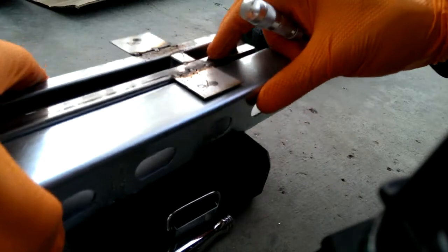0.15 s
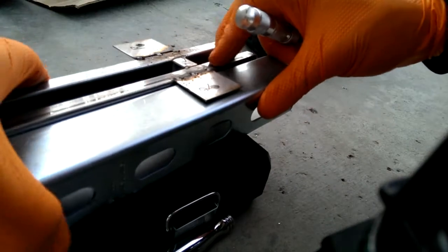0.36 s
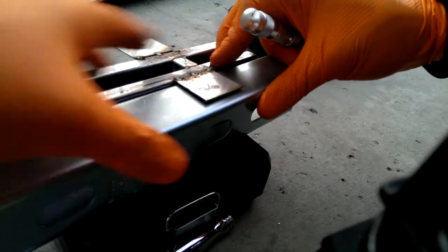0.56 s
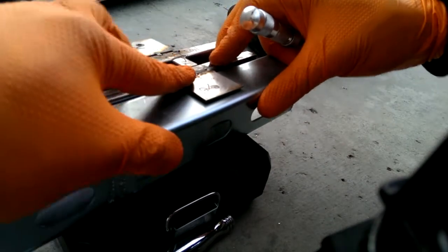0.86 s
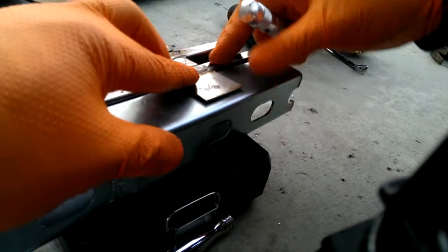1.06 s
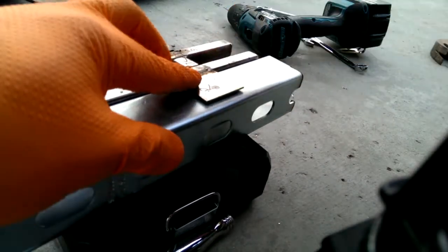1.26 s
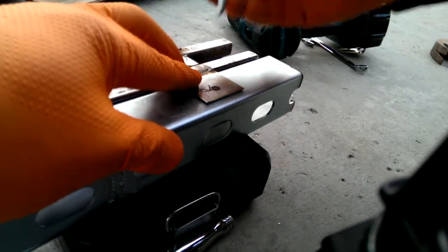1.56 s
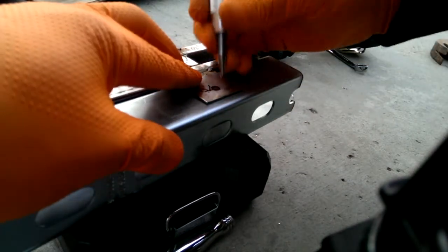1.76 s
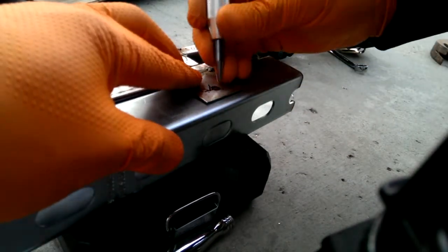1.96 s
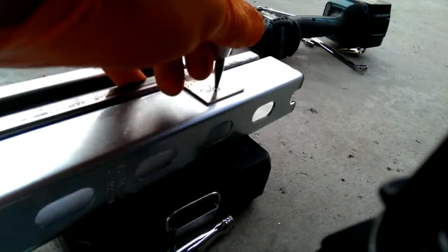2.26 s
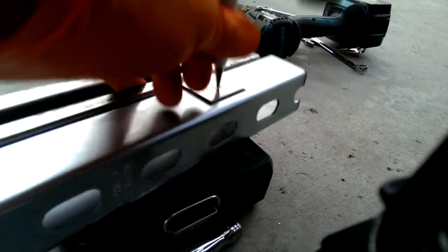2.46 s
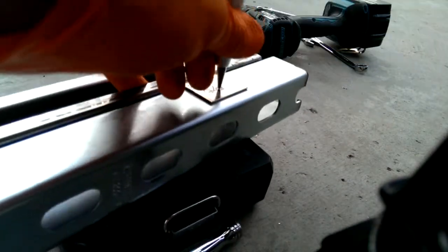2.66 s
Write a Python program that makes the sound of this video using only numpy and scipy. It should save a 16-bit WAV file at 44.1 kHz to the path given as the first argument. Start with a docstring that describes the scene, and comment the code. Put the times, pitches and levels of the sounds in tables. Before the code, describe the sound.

A center punch fires with one hard metallic crack near the end, plate bouncing and ringing briefly. Earlier, a loose steel plate scrapes and knocks on a beam, then faint glove rustles; close microphone, low workshop hum.

```python
"""A workshop's low rumble (shaped noise) and hum (wavering tones) run throughout. A gloved worker nudges a
steel plate along a perforated steel beam: it chatters (many tiny puffs of noise) and knocks (fading bursts).
Gloves rustle (soft swells of grainy noise) and tick. Then a spring-loaded center punch fires: sharp bursts,
after which plate and tip bounce, the plate rattles and the steel rings (fading sine tones)."""
import sys
import numpy as np
from scipy import signal
from scipy.fft import rfft, irfft
from scipy.io import wavfile
from scipy.ndimage import uniform_filter1d

SR = 44100
rng = np.random.default_rng(int(sys.argv[2]) if len(sys.argv) > 2 else 0)


def pcm_store(signal):
    """Save signal as 16-bit PCM."""
    levels = np.round(np.clip(np.atleast_2d(signal), -1, 1) * 32767)
    wavfile.write(sys.argv[1], SR, levels.astype(np.int16).T)


def boost_factor(decibels):
    """Convert a level in decibels to a linear amplitude factor."""
    exponent = np.asarray(decibels, float) / 20
    return 10 ** exponent


N = 123479  # length in samples

# All levels in dB are those of a layer before the side balance and the soft overload.
# Room noise of the shop. Each row: frequency in Hz, relative level in dB.
SHOP_SPECTRUM = [(28, -37), (40, 3), (60, 1), (85, -12.5), (150, -20.5), (250, -22.5), (450, -32),
                 (1350, -36), (5000, -44.5), (13000, -51), (16000, -50)]
# How alike the room noise is on both sides. Each row: frequency in Hz, likeness from -1 to 1.
SHOP_LIKENESS = [(60, 0.52), (380, 0.39), (2380, -0.013), (15000, -0.2)]
# Swell of the rumble. Each row: time in seconds, relative level in dB.
RUMBLE_SWELL = [(0, -44), (.2, -38.5), (.6, -45), (1.4, -45.5), (1.9, -47.5), (2.8, -47.5)]
# Fuzzy tones of the hum. Each row: multiple of the hum's pitch, relative level in dB, width in Hz.
HUM_TONES = [(1, -50, 7.7), (2, -61, 34)]
# The hum's third multiple. Each row: time in seconds, level in dB.
HUM_THIRD = [(0, -58.5), (.15, -46.5), (.35, -59), (.55, -49.5), (.65, -70), (.85, -51.5), (1.0, -68.5),
             (1.55, -76), (1.75, -58), (2.8, -61)]
# Loose plate chattering as it slides. Each row: time in seconds, relative level in dB.
SLIDE = [(0, -46), (.04, -51), (.06, -56), (.11, -61.5), (.116, -37.5), (.215, -39), (.24, -49), (.33, -41),
         (.37, -60)]
# Loose plate chattering after the snap. Each row: time in seconds, relative level in dB.
RATTLE = [(2.367, -33.5), (2.43, -30.5), (2.49, -30.5), (2.535, -41), (2.55, -32.5), (2.6, -48),
          (2.70, -53.5), (2.725, -58.5), (2.8, -63)]
# Colour of the chattering steel. Each row: frequency in Hz, relative level in dB.
STEEL_COLOUR = [(60, -54), (200, 0), (500, 1), (4200, -2.5), (14400, -17.5)]
# The plate knocks on the beam.
# Each row: start in seconds, relative level in dB, centre in Hz, seconds to fade by 60 dB.
KNOCKS = [(.114, -25.5, 714, 0.016), (.1245, -19.5, 6030, 0.01), (.141, -26, 2730, 0.045),
          (.1815, -16.5, 2500, 0.021), (.2005, -17.5, 1150, 0.023), (.2505, -13.5, 7360, 0.0088),
          (.2682, -13, 1800, 0.014), (.2815, -12, 2750, 0.021), (.335, -23.5, 1640, 0.041)]
# Faint ticks of gloves and tip.
# Each row: start in seconds, relative level in dB, centre in Hz, octaves to 6 dB down (sign ignored).
TICKS = [(.671, -34, 1210, 0.5), (.689, -48.5, 11000, 6), (.754, -44.5, 4700, 0.5), (0.971, -43, 6330, -6),
         (1.123, -46, 4960, 1.5), (1.305, -43.5, 3230, 0.7), (1.429, -38.5, 4400, 0.7),
         (1.442, -36.5, 1090, 1.24), (1.4811, -33, 3070, 1), (2.165, -42.5, 1740, 1.2)]
# The punch fires. Each row: start in seconds, relative level in dB, centre in Hz, seconds to fade by 60 dB.
SNAPS = [(2.367, -8, 2560, 0.014), (2.372, -5.5, 3330, 0.076), (2.389, -12.5, 4700, 0.071)]
# Plate and tip bounce after the snap.
# Each row: start in seconds, relative level in dB, centre in Hz, seconds to fade by 60 dB.
BOUNCES = [(2.396, -9, 2360, 0.035), (2.404, -16, 1370, 0.023), (2.423, -24, 400, 0.013),
           (2.441, -17, 1210, 0.01), (2.470, -14, 1150, 0.024), (2.484, -21, 2980, 0.12),
           (2.510, -17, 1120, 0.028), (2.542, -17, 3500, 0.079), (2.565, -24, 980, 0.062),
           (2.607, -23, 1710, 0.027), (2.641, -32.5, 1780, 0.028), (2.660, -28, 3150, 0.017),
           (2.692, -30, 1750, 0.047)]
# Reflections from beam and floor. Each row: frequency in Hz, seconds to fade by 60 dB.
TAIL_FADE = [(300, 0.036), (3000, 0.13), (12000, 0.053)]
# Gloves and sleeves brush. Each row: start in seconds, length in seconds, centre in Hz,
# octaves to 6 dB down (sign ignored), relative level in dB.
BRUSHES = [(0.428, 0.15, 5200, 1.7, -54.5), (0.574, 0.096, 3560, 0.6, -60.5),
           (0.699, 0.11, 1980, 0.94, -60.5), (0.99, 0.059, 10400, 2.5, -61.5),
           (1.214, 0.089, 2290, 1.0, -61), (1.827, 0.05, 12000, 2.5, -71), (2.009, 0.11, 2970, 0.5, -71),
           (1.559, 0.086, 12500, 1.2, -63.5), (1.57, 0.076, 2060, 0.5, -57),
           (2.191, 0.11, 3730, -0.35, -62)]
# Strong ringing tones of the steel.
# Each row: frequency in Hz, relative level in dB, seconds to fade by 60 dB (before any stifling).
STEEL_MODES = [(310, -3, .1), (470, -13, .2), (630, -21, .7), (2569, -15, .25), (2760, -24, .8),
               (3363, -13, .35), (3955, -10, .25), (4314, 3, .7), (4371, -3, .5), (4528, -11, .45),
               (6524, -12, .5), (11713, -12, .5)]
# Side balance of the near sounds. Each row: frequency in Hz, left minus right in dB.
NEAR_BALANCE = [(600, 1), (1400, 7), (3000, 5), (5500, 8.5), (9000, 14), (14000, 17.5)]
# Side balance of the punch's snap. Each row: frequency in Hz, left minus right in dB.
PUNCH_BALANCE = [(1200, 10.5), (3500, -11), (11000, 3)]

SHOP_DB, SHOP_SIDE_DB = -43, 0.3  # noise level before its swell; left is raised and right lowered by this
HUM_HZ = 65.07
CHATTER_PER_S, CHATTER_SPREAD_DB = 1500, 3  # average count of contacts; how uneven they are
SLIDE_TILT_DB, RATTLE_TILT_DB = -2.5, -1  # per octave, added to the steel's colour
KNOCK_OCTAVES, BLOW_OCTAVES = (3.5, 0.82), (1.35, 0.67)  # to 6 dB down, below and above the centre
TICK_T60_S = 0.013  # seconds to fade by 60 dB
UNLIKE = 0.99  # noise of each side's own, against 1 of the noise they share
TAIL_DB = -5
BLOW_RING_DB = -12  # how strongly blows drive the ringing
DENSE_DB, DENSE_T60_S = -18, 0.29  # many weak modes: highest level, scale of their fading times
DAMP_S, DAMP_DB_PER_S, DAMP_ABOVE_HZ = 2.518, 155, 3000  # the settling plate stifles its high ring
RIGHT_LAG_S = 0.000247
BASS_EDGE_HZ, TREBLE_EDGE_HZ = 32, 15900


def evened(x):
    """Scales to rms 1."""
    return x / np.sqrt(np.mean(x ** 2) + 1e-20)


def read(points, hz):
    """Reads a table of frequencies, evenly by pitch between its rows."""
    f, value = np.transpose(points)
    return np.interp(np.log(hz + 1), np.log(f + 1), value)


def add(mix, s, sound):
    """Mixes a sound in at s seconds."""
    part = mix[..., round(s * SR):][..., :sound.shape[-1]]
    part += sound[..., :part.shape[-1]]


def colour(x, db_at, lag_s=0):
    """Filters by a gain in dB given as a function of frequency, and delays by lag_s."""
    hz = np.fft.rfftfreq(x.shape[-1], 1 / SR)
    delay = np.exp(-2j * np.pi * hz * lag_s)
    return irfft(rfft(x) * boost_factor(db_at(hz)) * delay, x.shape[-1])


def peaked(noise, centre_hz, below, above):
    """Noise that falls away ever faster on both sides of a centre."""
    def db_at(hz):
        octaves = np.log2((hz + 1) / centre_hz)
        width = np.where(octaves < 0, below, above)
        return -6 * abs(octaves / width) ** 1.3
    return evened(colour(noise, db_at))


def sides(x, balance):
    """Sound reaches the left side first, and its balance depends on frequency."""
    left = colour(x[0], lambda hz: read(balance, hz) / 2)
    right = colour(x[1], lambda hz: -read(balance, hz) / 2, RIGHT_LAG_S)
    return np.array([left, right])


def rumble_swell():
    """The rumble's rise and fall in dB around its mean, one value for every 512 samples."""
    frame_s = np.arange(N // 512 + 5) * 512 / SR
    swell = np.interp(frame_s, *np.transpose(RUMBLE_SWELL))
    return frame_s, swell - swell.mean()


def room_noise(swell):
    """Random spectra, partly shared by the sides, whose low end swells and fades."""
    hz = np.fft.rfftfreq(2048, 1 / SR)[:, None]
    a, b, c, d = rng.standard_normal((len(swell), 1025, 4)).T
    same = np.clip(read(SHOP_LIKENESS, hz), -1, 1)
    left = a + 1j * b
    right = same * left + np.sqrt(1 - same ** 2) * (c + 1j * d)
    spectra = np.array([left, right]) * boost_factor(read(SHOP_SPECTRUM, hz))
    level = np.std(signal.istft(spectra, nperseg=2048, noverlap=1536)[1])
    spectra *= boost_factor(swell / (1 + (hz / 150) ** 2))  # the swell weakens towards the treble
    air = signal.istft(spectra, nperseg=2048, noverlap=1536)[1][:, :N]
    return air * boost_factor(SHOP_DB) / level


def fuzzy(hz, width):
    """Noise in a narrow resonance: a tone that wavers."""
    r = np.exp(-np.pi * abs(width) / SR)
    noise = rng.standard_normal(N) + 1j * rng.standard_normal(N)
    slow = signal.lfilter([1], [1, -2 * r, r * r], noise)
    return evened((slow * np.exp(2j * np.pi * hz * np.arange(N) / SR)).real)


def machine_hum(frame_s, swell):
    """Wavering tones that swell with the rumble, and a sine at three times the pitch with its own level."""
    t = np.arange(N) / SR
    tones = sum(boost_factor(db) * fuzzy(k * HUM_HZ, width) for k, db, width in HUM_TONES)
    tones = tones * boost_factor(np.interp(t, frame_s, swell))
    third = np.sqrt(2) * np.sin(2 * np.pi * 3 * HUM_HZ * t)
    return tones + third * boost_factor(np.interp(t, *np.transpose(HUM_THIRD)))


def shop():
    """Room noise and machine hum, slightly left of centre."""
    frame_s, swell = rumble_swell()
    sound = room_noise(swell) + machine_hum(frame_s, swell)
    return sound * boost_factor(np.array([[SHOP_SIDE_DB], [-SHOP_SIDE_DB]]))


def chatter(rows, tilt_db):
    """Tiny contacts of uneven size, each a short puff of fresh noise."""
    contacts = rng.random(N) < CHATTER_PER_S / SR
    sizes = contacts * boost_factor(CHATTER_SPREAD_DB * np.minimum(rng.exponential(1, N), 4))
    puffs = signal.lfilter([1], [1, -np.exp(-1 / 40)], sizes ** 2) ** .5  # power fades over 40 samples
    noise = rng.standard_normal((3, N))

    def db_at(hz):
        return read(STEEL_COLOUR, hz) + tilt_db * np.log2((hz + 1) / 2000)
    grains = colour(puffs * (noise[0] + UNLIKE * noise[1:]), db_at)
    # silence outside the table
    level_db = np.interp(np.arange(N) / SR, *np.transpose(rows), left=-120, right=-120)
    return evened(grains) * boost_factor(level_db)


def hits(rows, octaves):
    """Each hit is a sudden burst coloured around its centre, dying fast."""
    out, t = np.zeros((2, N)), np.arange(4096) / SR
    widths = np.broadcast_to(octaves, (len(rows), 2))
    for (s, db, centre_hz, t60), width in zip(rows, widths):
        noise = rng.standard_normal((3, 4096))
        burst = peaked(noise[0] + UNLIKE * noise[1:], centre_hz, *width)
        onset = np.minimum(t / 0.00089, 1)
        add(out, s, burst * boost_factor(db - 2 - 60 * t / t60) * onset)
    return out


def tail(x):
    """Reflections: sparse taps of random sign, other taps per side, each band dying at its own speed."""
    taps = rng.choice([-1., 1.], (2, SR // 4)) * (rng.random((2, SR // 4)) < .1)
    hz, t, spectra = signal.stft(taps, SR, nperseg=64)
    fade = boost_factor(-60 * t / read(TAIL_FADE, hz)[:, None])
    ring = signal.istft(spectra * fade, SR, nperseg=64)[1]
    return signal.fftconvolve(x[None], ring / np.linalg.norm(ring[0]), axes=1)[:, :N]


def gloves():
    """Soft brushes: grainy noise that swells and fades in an arch."""
    t, out = np.arange(N) / SR, np.zeros((2, N))
    unevenness = evened(uniform_filter1d(rng.standard_normal(N), 150))
    grain = rng.standard_normal((2, N)) * boost_factor(2.5 * unevenness)
    for s, length, centre_hz, octaves, db in BRUSHES:
        arch = abs(np.sin(np.pi * np.clip((t - s) / length, 0, 1))) ** 0.7
        out += boost_factor(db) * arch * peaked(grain, centre_hz, octaves, octaves)
    return out


def weak_modes():
    """Many weak modes of the beam at random pitches, the higher ones fading sooner on the whole."""
    place, size, life = rng.random((3, 400))
    hz = 350 + 14500 * place ** 1.7
    t60 = DENSE_T60_S * (0.42 + 0.64 * life) * np.minimum(4000 / hz, 1) ** .3
    return list(zip(hz, DENSE_DB - 10 * size, t60))


def steel():
    """Blows ring the modes of plate, beam and punch, with other phases per side; high ones get stifled."""
    t, drive = np.arange(SR // 2) / SR, np.zeros(N)
    for s, db, centre_hz, _ in SNAPS + BOUNCES:
        brightness = min(centre_hz / 3500, 1)  # brighter blows ring more
        add(drive, s, np.array([boost_factor(db + BLOW_RING_DB) * brightness]))
    bank = np.zeros((2, 2, SR // 2))  # low and high modes, left and right
    for hz, db, t60 in STEEL_MODES + weak_modes():
        turn = rng.random((2, 1))
        bank[int(hz > DAMP_ABOVE_HZ)] += boost_factor(db - 60 * t / t60) * np.sin(2 * np.pi * (hz * t + turn))
    bank *= np.minimum(t / 0.00071, 1)  # brief onset
    low, high = signal.fftconvolve(drive[None, None], bank, axes=2)[..., :N]
    return low + high * boost_factor(-DAMP_DB_PER_S * np.maximum(np.arange(N) / SR - DAMP_S, 0))


def scene():
    """Chatter, knocks, gloves, snap and ringing steel over the shop."""
    background = shop()
    struck = chatter(SLIDE, SLIDE_TILT_DB) + hits(KNOCKS, KNOCK_OCTAVES)
    struck += hits([row[:3] + (TICK_T60_S,) for row in TICKS], [row[3:] for row in TICKS])
    snaps = hits(SNAPS, BLOW_OCTAVES)
    struck += chatter(RATTLE, RATTLE_TILT_DB) + hits(BOUNCES, BLOW_OCTAVES)
    reflections = boost_factor(TAIL_DB) * tail((struck + snaps).mean(0))
    near = struck + reflections + gloves() + steel()
    return background + sides(near, NEAR_BALANCE) + sides(snaps, PUNCH_BALANCE)


def roll_off(x):
    """The treble ends steeply here."""
    return signal.sosfilt(signal.butter(12, 16850, fs=SR, output="sos"), x)


def record(dry):
    """Rolls off the bass, softly overloads the peaks and cuts the highest treble."""
    bass_cut = signal.butter(4, BASS_EDGE_HZ, "high", fs=SR, output="sos")
    soft = np.tanh(signal.sosfilt(bass_cut, dry))
    treble_cut = signal.firwin(511, TREBLE_EDGE_HZ, window=("kaiser", 9), fs=SR)
    finished = signal.oaconvolve(soft, treble_cut[None], "same")
    return roll_off(finished)


dry = scene()
out = record(dry)
pcm_store(out)
```